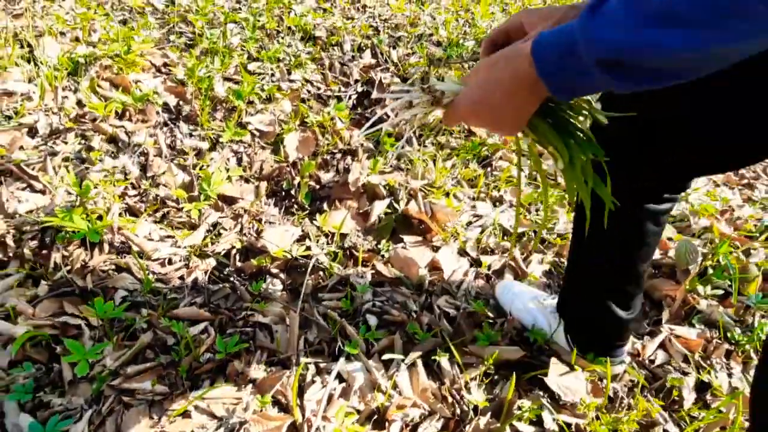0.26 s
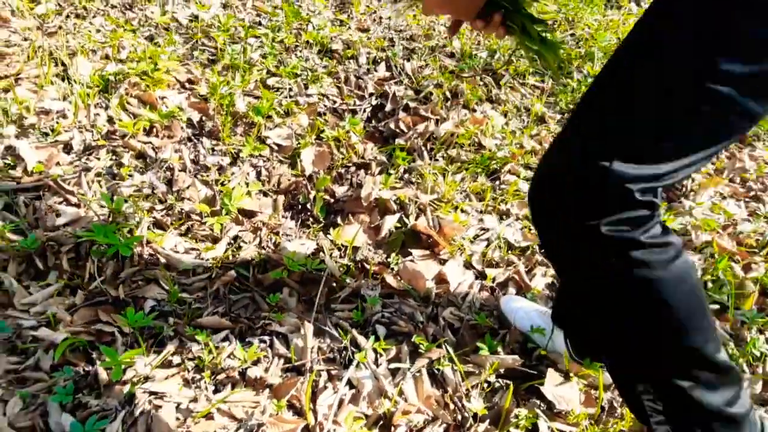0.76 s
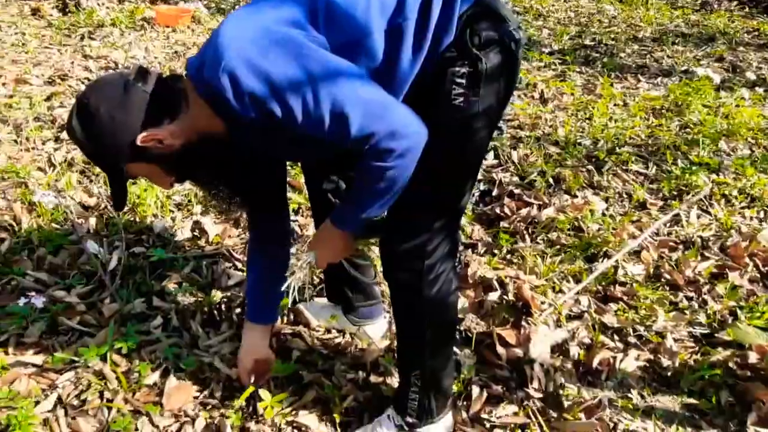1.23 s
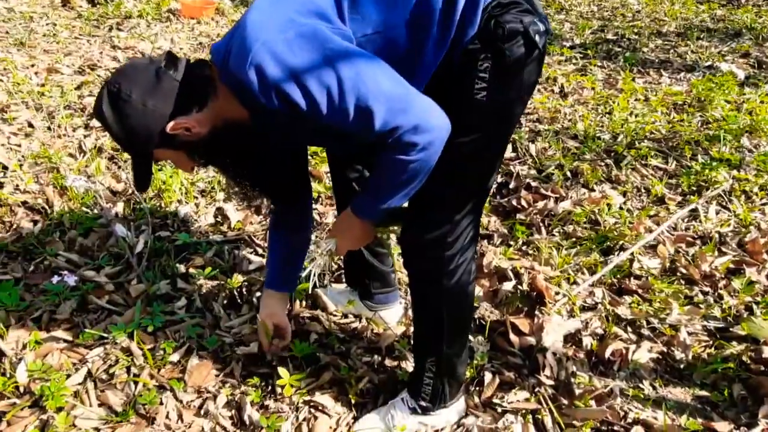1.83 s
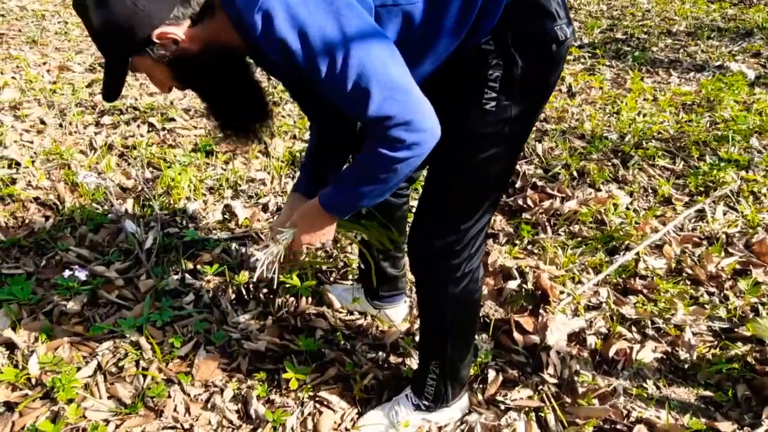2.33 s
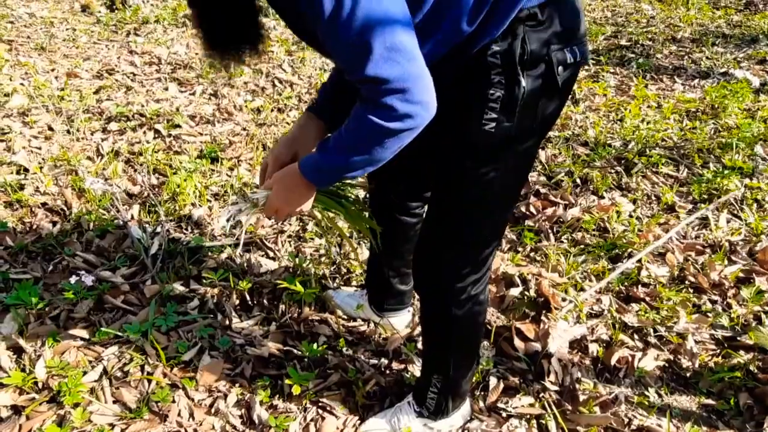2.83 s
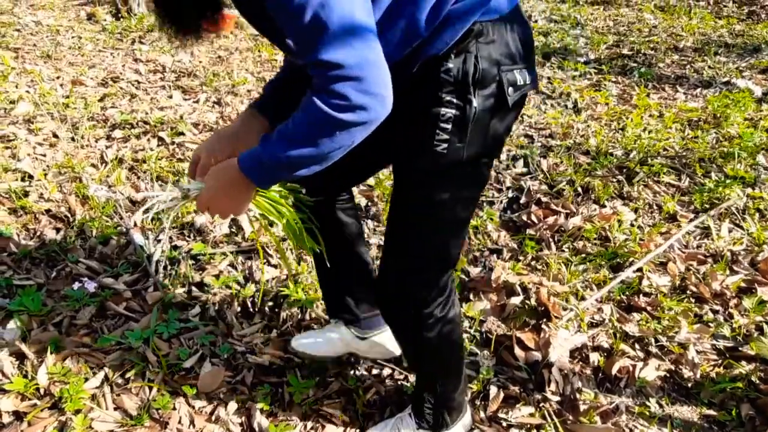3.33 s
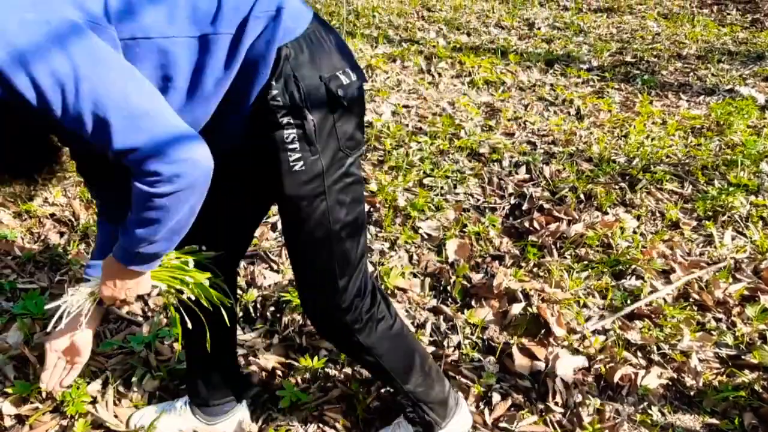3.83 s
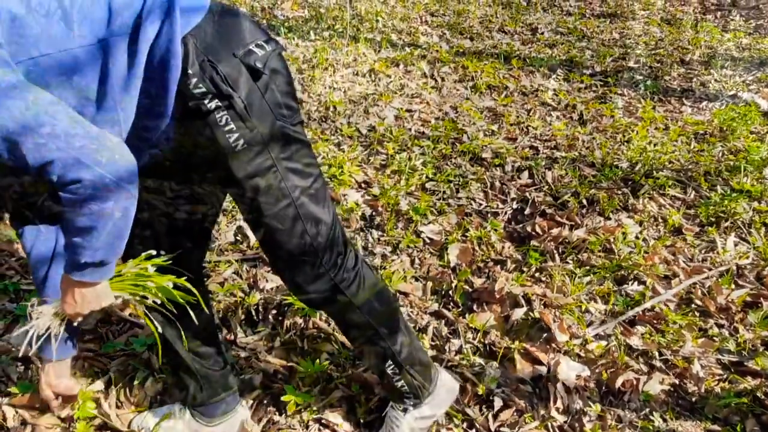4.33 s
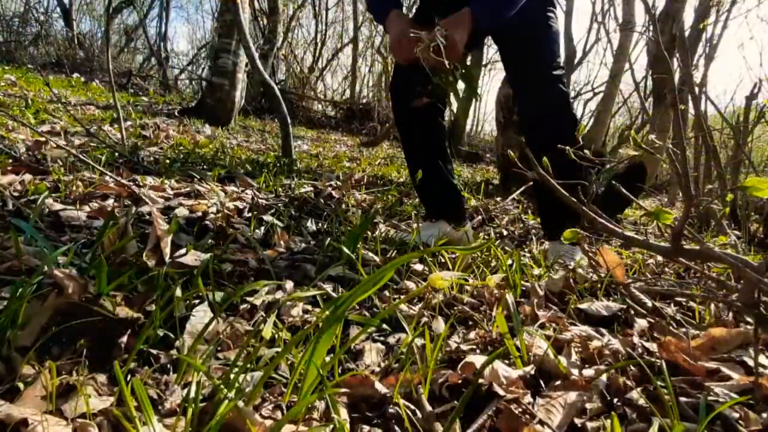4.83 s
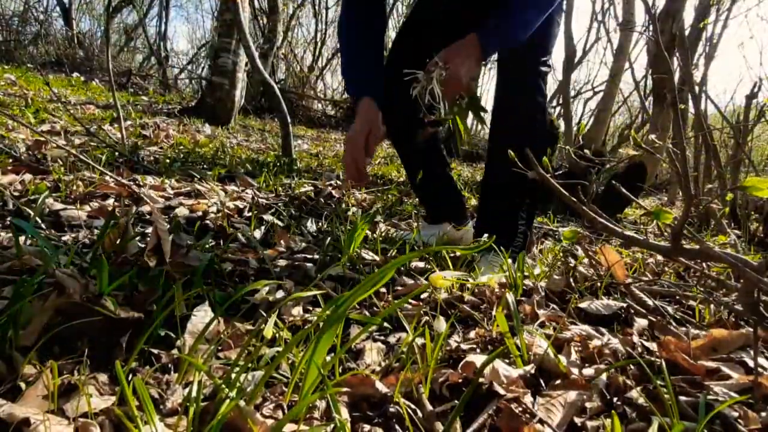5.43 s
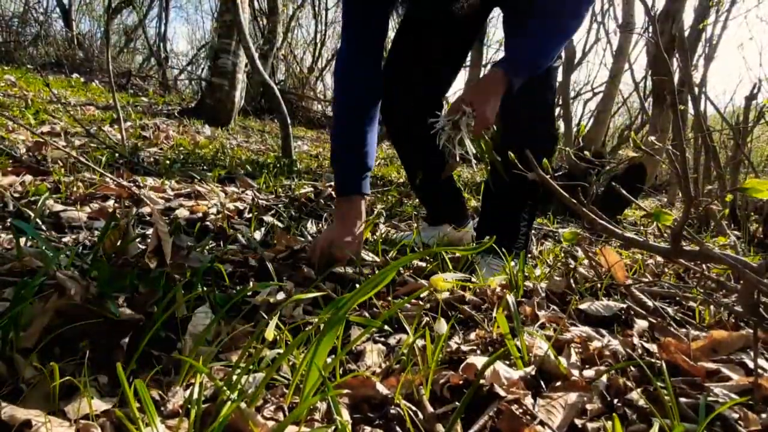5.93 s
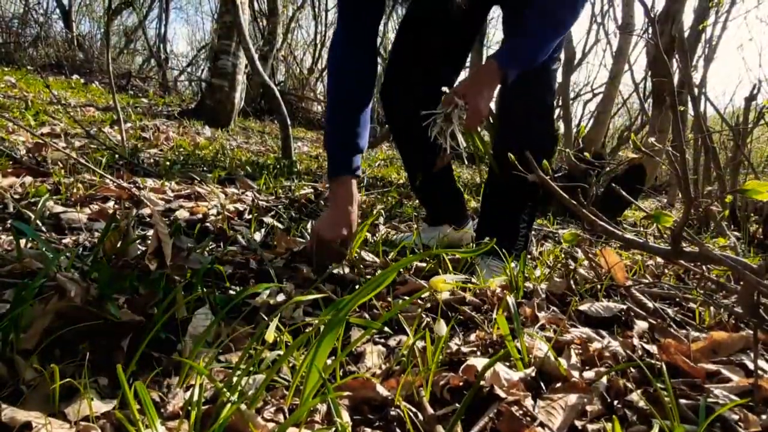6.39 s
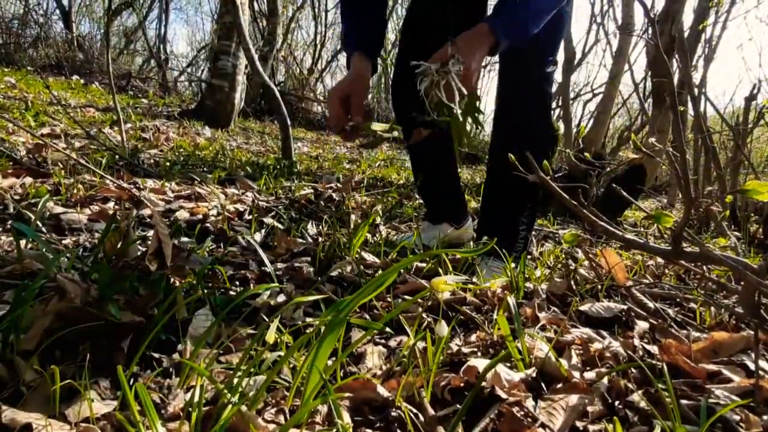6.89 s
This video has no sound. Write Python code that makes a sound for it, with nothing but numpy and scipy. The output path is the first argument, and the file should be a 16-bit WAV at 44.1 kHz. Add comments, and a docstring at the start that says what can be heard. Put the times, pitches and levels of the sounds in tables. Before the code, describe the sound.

Someone treads through crisp fallen leaves and pulls small plants from soil. Grainy crackle over papery hiss comes in uneven bursts, the strongest early on and again midway, separated by quiet gaps of faint ticking. Single stalks snap sharply and short hollow knocks come from roots and soles. The stereo sound is close, dry and open, with barely audible low air and no echo.

```python
"""In a quiet wood, someone steps through dry leaf litter and pulls up small plants, close to the microphone.
Shoes and hands crush the leaves in short swells: random tiny fractures over a chafing hiss, as shaped noise.
Stalks and twigs snap singly as bursts of noise with one resonance.
Roots and soles give dull knocks: decaying modes, a crunch of soil and a thud of the ground.
Faint air, as coloured noise, lies underneath."""
import sys
import numpy as np
from scipy import signal
from scipy.fft import rfft, irfft, next_fast_len
from scipy.io import wavfile

SR = 44100
rng = np.random.default_rng(int(sys.argv[2]) if len(sys.argv) > 2 else 0)


def generate_wav(sig):
    """Save sig (samples, or channels by samples) to the path in sys.argv[1] as 16-bit PCM at SR."""
    pcm = np.round(np.clip(np.atleast_2d(sig).T, -1, 1) * 32767).astype(np.int16)
    wavfile.write(sys.argv[1], SR, pcm)


N = 315300
TIME = np.arange(N) / SR
PADDED = next_fast_len(N, real=True)
DEEP_HZ, CRISP_HZ, TOP_HZ = 1000, 5000, 16100  # upper limits of deep litter, leaf blades and brittle edges


def undb(db):
    """Decibel law: 20 dB is a factor of ten in amplitude."""
    return np.exp(np.asarray(db) * (np.log(10) / 20))


def unit(x):
    """Normalisation: the same sound at rms 1."""
    return x / np.sqrt(np.mean(x ** 2))


def colour(table, hz):
    """Spectral envelope: gain of a (Hz, dB) table, interpolated along log frequency."""
    points, db = np.transpose(table)
    return undb(np.interp(np.log(hz + 1), np.log(points), db))


def panned(db):
    """Level-difference panning: left and right gains that share the difference equally."""
    return undb(np.array([[.5], [-.5]]) * db)


def walk(rate):
    """Slow modulation: random levels, rate of them a second, joined by straight lines; spread near 1."""
    count = int(N / SR * rate) + 2
    levels = 1.15 * rng.standard_normal(count)
    return np.interp(TIME * rate, np.arange(count), levels)


# width between the two ports: pitch_hz, side_minus_mid_db [Hz, dB]
PORT_WIDTH = [(60, -6.5), (160, -7), (350, -11), (700, -9.5), (1300, -3), (2400, -5), (4400, -4),
              (6000, -1.5), (8000, -3.5), (14000, -8)]
# difference in colour of the two ports: pitch_hz, left_minus_right_db [Hz, dB]
PORT_SHADE = [(300, 0), (700, -0.5), (1300, 4), (2400, .5), (4400, -3), (8000, 1), (14000, -2)]


def ports(pair):
    """Coherence: two unrelated sounds mix to left and right spectra, most alike around 350 to 700 Hz."""
    mid, side = rfft(pair)
    hz = np.fft.rfftfreq(pair.shape[1], 1 / SR)
    width = colour(PORT_WIDTH, hz)
    shade = colour(PORT_SHADE, hz) ** np.array([[.5], [-.5]])
    mixed = np.array([mid + width * side, mid - width * side])
    return mixed * shade / np.sqrt(1 + width ** 2)


# strokes of a shoe or hand through the litter: full_force_s [s], level_db [dB], rise_s, hold_s, fall_s [s],
# crispness_db, deep_litter_weight_db [dB re level], chafing_over_crackle_db [dB]
STIRRING_STROKES = [(0.0, -50, 0.05, 0.00906, 0.1, 3.9, -13, 8),
                    (0.108, -33.5, 0.061, 0.053, 0.077, 7.5, -11, 6.5),
                    (0.486, -41, 0.29, 0.015, 0.35, 2, -11.5, 4.0),
                    (0.571, -33, 0.056, 0.049, 0.14, 2, -9.0, 4.5),
                    (1.078, -45, 0.27, 0.1, 0.16, 0.5, -8.5, 7),
                    (1.221, -28, 0.038, 0.15, 0.072, 1.5, -8.7, -1),
                    (1.277, -29.5, 0.058, 0.13, 0.26, 4.5, -3, 3),
                    (1.556, -38, 0.088, 0.0113, 0.22, 3, -13, 7),
                    (1.8, -53.5, 0.16, 0.067, 0.258, 4, -36, 4),
                    (2.466, -56, 0.03, 0.008, 0.16, -2, -11, 5),
                    (2.856, -56, 0.61, 0.04, 0.2, 1.5, -14.5, 0.5),
                    (3.181, -38, 0.19, 0.074, 0.25, 1, -11.5, 4),
                    (3.434, -37, 0.14, 0.01, 0.58, 2, -6.5, -1),
                    (3.584, -32.5, 0.047, 0.025, 0.058, 8.0, -19, 0.5),
                    (3.663, -29, 0.12, 0.016, 0.19, 7.5, -6.5, 7),
                    (3.801, -35.5, 0.136, 0.084, 0.232, 5.5, -6, 1),
                    (4.031, -40, 0.071, 0.069, 0.41, 4, -8.5, 8),
                    (4.693, -52.5, 0.32, 0.023, 0.31, 5.5, -14, 1.5),
                    (4.758, -49, 0.0097, 0.0082, 0.063, 8, -1.5, 7.5),
                    (4.912, -50.5, 0.232, 0.019, 0.12, 7, -8.5, 12),
                    (5.228, -42.5, 0.069, 0.017, 0.1, 9, -13, 6),
                    (5.291, -30.5, 0.066, 0.066, 0.04, 2.5, -5.5, 4),
                    (5.416, -36.5, 0.045, 0.009, 0.29, 0, -8, -3),
                    (5.589, -39, 0.025, 0.008, 0.064, -0.2, -10.5, 1),
                    (5.722, -45.5, 0.194, 0.16, 0.21, 6, -7, 2.5),
                    (5.96, -49.5, 0.054, 0.034, 0.48, 8, -11, -1),
                    (6.315, -49.5, 0.26, 0.028, 0.14, 0.5, -6, 1.5),
                    (6.539, -51.5, 0.82, 0.073, 0.22, 8.5, -10, 3),
                    (6.807, -58.5, 0.052, 0.0074, 0.039, -1, -21, -1),
                    (6.933, -53, 0.061, 0.017, 0.18, 1, -17.5, 0.5),
                    (7.11, -50.5, 0.16, 0.036, 0.102, 5.5, -12.6, 0)]
STROKE_RANGE_DB = 20  # a stroke climbs this far in its rise time and drops as far in its fall time
# the bunch of plants in the hand never quite rests: the same four qualities as a stroke [dB]
BUNCH_DB, BUNCH_CRISP_DB, BUNCH_WEIGHT_DB, BUNCH_CHAFE_DB = -71, 7.5, -13.5, 7.5


def stirring(t):
    """Incoherent addition: strokes rise, hold and fall, and their powers add; four tracks in dB."""
    power = undb(2 * BUNCH_DB) + np.zeros(len(t))
    bunch_character_db = np.array([[BUNCH_CRISP_DB], [BUNCH_WEIGHT_DB], [BUNCH_CHAFE_DB]])
    shares = undb(2 * bunch_character_db) * power
    for s, db, rise, hold, fall, *character_db in STIRRING_STROKES:
        away = np.maximum(s - t, 0) / rise + np.maximum(t - s - hold, 0) / fall
        stroke = undb(2 * (db - STROKE_RANGE_DB * np.minimum(away, 10)))
        power = power + stroke
        shares = shares + undb(2 * np.array(character_db))[:, None] * stroke
    tracks = (power, *(shares / power))  # level, crispness, weight, chafing
    return [np.interp(TIME, t, 10 * np.log10(p)) for p in tracks]


def fractures(per_s, spread_db, ring_s, chafe):
    """Shot noise: strength of contact from tiny breaks of uneven size, each dying fast, over chafing."""
    hit = rng.random(N) < per_s / SR
    size = undb(spread_db * np.minimum(rng.exponential(size=N), 3.3))
    fade = np.exp(-2 / (ring_s * SR))  # power dies twice as fast as amplitude
    power = signal.lfilter([1 - fade], [1, -fade], hit * size ** 2)
    power = power * SR / per_s / np.mean(size ** 2)
    return np.sqrt((power + chafe ** 2) / (1 + chafe ** 2))


# colour of the dry leaves as heard through the microphone: pitch_hz, level_db [Hz, dB per Hz]
LEAF_COLOUR = [(45, -24), (110, -22), (180, -17), (250, -14.5), (315, -3), (440, -8.5), (680, -2.5),
               (1500, 0), (4000, 1.5), (7400, 7), (9500, -9), (11200, -0.5), (13400, 4.5), (16000, -1.5)]
# sound off the ground cancels the direct sound around one pitch, set by the microphone's height:
# time_s, pitch_hz, depth_db [s, Hz, dB]
GROUND_CANCELLATION = [(0, 2680, -3.5), (4.3, 2660, -3.5), (4.7, 2180, -7), (7.15, 2170, -9)]


def leaves(contact, lo, hi, count, flutter_db, flutter_rate, tilt_db=0):
    """Modulated resonance: one size range of leaves, whose narrow bands come and go as they bend."""
    hz = np.fft.rfftfreq(PADDED, 1 / SR)
    grains = np.pad(rng.standard_normal((2, N)) * contact, ((0, 0), (0, PADDED - N)))
    sound = (ports(grains) * colour(LEAF_COLOUR, hz)).astype(np.complex64)
    place = count * np.log((hz + 1) / lo) / np.log(hi / lo) - .5  # band number of each frequency
    dip_s, dip_hz, depth_db = np.transpose(GROUND_CANCELLATION)
    out = 0
    for k in range(count):
        band = np.maximum(1 - abs(place - k), 0).astype(np.float32)
        height = (k + .5) / count  # 0 to 1 from lo to hi
        centre = lo * (hi / lo) ** height
        nearness = np.exp(-(np.log(centre / dip_hz) / 0.13) ** 2)
        dip_db = np.interp(TIME, dip_s, depth_db * nearness)
        db = flutter_db * walk(flutter_rate) + tilt_db * (height - .6) + dip_db
        out = out + irfft(sound * band, PADDED)[:, :N] * undb(db).astype(np.float32)
    return unit(out)


def wander(pair, lag_s, rate):
    """Time-difference cue: the crackle shifts about the ground, reaching now one port first, now the other."""
    lag = lag_s * walk(rate) / 2
    left = np.interp(TIME + lag, TIME, pair[0])
    right = np.interp(TIME - lag, TIME, pair[1])
    return np.array([left, right])


# where the person works: time_s, left_minus_right_db [s, dB]
WORKING_PLACE = [(0, 1.3), (1.3, 1.8), (2.7, 2.5), (4.2, 2.5), (5.2, 0.1), (6.4, 2), (7.15, 1)]
SINK_S = 0.0031  # the deep litter gives this much later than the leaves on top
EDGE_LEAD_S = 0.0034  # the brittle top edges are brushed this much sooner than the leaves
# the further a touch is below firm, the more it tilts towards the small stiff leaves
FIRM_DB, LIGHT_DB_PER_DB = -35.5, 0.18


def rustle():
    """Event density: harder stirring breaks more leaves a second, so loud swells smooth, light touches tick."""
    crush_db, crisp_db, weight_db, chafe_db = stirring(TIME[::32])
    chafe = undb(chafe_db)
    per_s = 900 * undb(.35 * (crush_db + 39.5))
    contact = fractures(per_s, spread_db=4.5, ring_s=0.0015, chafe=chafe)
    contact = contact * undb(1.17 * walk(70))
    # broad damp leaves buckle more slowly
    folds = fractures(per_s / 2, spread_db=2.5, ring_s=0.0026, chafe=0.4 * chafe)

    deep_contact = np.hypot(0.66 * contact, folds)
    deep = leaves(deep_contact, 45, DEEP_HZ, count=16, flutter_db=2.0, flutter_rate=25)
    deep = deep * undb(np.interp(TIME - SINK_S, TIME, crush_db + weight_db) - 4.5)

    light_tilt_db = LIGHT_DB_PER_DB * (FIRM_DB - crush_db)
    blades = leaves(np.hypot(contact, .5 * folds), DEEP_HZ, CRISP_HZ, count=18,
                    flutter_db=2.5, flutter_rate=30, tilt_db=light_tilt_db)
    blades = wander(blades, lag_s=7e-5, rate=7) * undb(crush_db - 0.63)

    edges = leaves(contact, CRISP_HZ, TOP_HZ, count=18, flutter_db=3.5, flutter_rate=32)
    edges = edges * undb(np.interp(TIME + EDGE_LEAD_S, TIME, crush_db + crisp_db) - 0.76)
    return (deep + blades + edges) * panned(np.interp(TIME, *np.transpose(WORKING_PLACE)))


# colour of the still air: pitch_hz, level_db [Hz, dB per Hz]
AIR_COLOUR = [(20, -33.5), (45, -4.5), (80, 0.5), (130, -3), (210, -18), (310, -10), (560, -28.5),
              (2000, -34.5), (16000, -29.5)]
AIR_DB = -71.5  # level about which the air drifts


def air():
    """Broadband ambience: noise under a spectral envelope is a faint low murmur of open air among trees."""
    hz = np.fft.rfftfreq(N, 1 / SR)
    noise = irfft(ports(rng.standard_normal((2, N))) * colour(AIR_COLOUR, hz), N)
    return unit(noise) * undb(AIR_DB + 0.93 * walk(0.97))


# knocks of roots and soles: start_s [s], pop_peak_db [dB], pitch_hz [Hz], ring_t60_s [s],
# soil_thud_db [dB re pop peak]
ROOT_KNOCKS = [(0.1577, -31.5, 344, 0.039, -12), (1.3209, -19, 700, 0.01, -27),
               (1.353, -22, 566, 0.0088, -23.5), (1.5852, -30, 720, 0.031, -37),
               (1.958, -56.5, 390, .03, -22.5), (3.449, -37.5, 383, 0.039, -29),
               (3.7795, -26, 870, 0.02, -40), (4.753, -28, 610, 0.01, -7), (5.59, -47, 520, 0.0087, -15),
               (6.298, -26.5, 763, 0.012, -14), (6.3333, -40, 625, 0.014, -5.5)]
# modes of a root as it gives: multiple_of_pitch, level_db [ratio, dB]
ROOT_MODES = [(.42, -7.5), (.65, -29), (1, 29), (1.55, 4.5), (2.5, 14.5)]
# modes of the soft ground: pitch_hz, level_db, ring_t60_s [Hz, dB, s]
SOIL_MODES = [(111.6, -14.5, 0.19), (155, -2.5, 0.12), (191.4, -8.5, 0.14), (260, -12, 0.035),
              (318, -2, 0.066)]
TEAR_DB, TEAR_S, TEAR_HZ = -8.5, .003, 750  # crunch of soil: level re pop peak, decay, centre of its band


def knocks(size=8192):
    """Modal decay: a root gives with a short hollow pop and a crunch of soil, and the ground thuds after it."""
    out = np.zeros(N + size)
    t = np.arange(size) / SR
    no_bass = signal.butter(3, 220, "high", fs=SR, output="sos")  # a small root radiates no bass
    soil_band = signal.butter(2, [TEAR_HZ / 2, TEAR_HZ * 2], "band", fs=SR, output="sos")
    for s, db, hz, t60, soil_db in ROOT_KNOCKS:
        detune = 1 + 0.08 * rng.standard_normal(len(ROOT_MODES))
        pop = np.zeros(size)
        for (multiple, mode_db), shift in zip(ROOT_MODES, detune):
            pop += undb(mode_db) * np.sin(2 * np.pi * hz * multiple * shift * t)
        pop = signal.sosfilt(no_bass, pop * np.exp(-np.log(1000) * t / t60))

        grit = signal.sosfilt(soil_band, rng.standard_normal(size))
        tear = unit(grit) * np.exp(-t / TEAR_S) * undb(TEAR_DB)

        thud = np.zeros(size)
        for mode_hz, mode_db, ring in SOIL_MODES:
            thud += undb(mode_db) * np.sin(2 * np.pi * mode_hz * t) * np.exp(-np.log(1000) * t / ring)
        thud = thud * (1 - np.exp(-t / 0.003))  # the soft ground answers late

        start = int(s * SR)
        out[start:start + size] += undb(db) * (pop / abs(pop).max() + tear - undb(soil_db) * thud)
    return out[:N]


# stalks and brittle leaves breaking: start_s [s], level_db [dB], ring_pitch_hz [Hz],
# crispness_db [dB], left_minus_right_db [dB]
STALK_SNAPS = [(0.491, -30.5, 1980, 0, 4), (0.5428, -21, 4500, 4, 0), (0.9849, -25, 6770, 2, 5),
               (1.0811, -32.5, 7160, 3, 3), (1.3212, -19, 3140, -11, 4), (1.354, -22.5, 7700, 3, 10),
               (1.3875, -26, 7300, 13, 2), (1.413, -21, 7600, 19, -8), (1.586, -29.5, 1360, -24, 7),
               (1.9575, -36.5, 2430, 6.5, -1), (2.4368, -45.5, 3940, 8, 4), (2.4787, -44.5, 3900, -15, 1),
               (2.558, -49, 2940, 1, 2), (2.584, -43.5, 8300, 43, -2), (2.64, -45, 4600, 14, 4),
               (2.715, -47, 4040, 0, 6), (2.8511, -46, 7700, 10, 0), (2.89, -41.5, 3950, 2, 1),
               (3.025, -46, 1600, 3, 6), (3.0546, -39, 7200, 20, 7), (3.347, -33.5, 6500, -28, 0),
               (3.4499, -32, 7000, 15.5, 10), (3.7802, -27, 1420, -13, 2), (3.878, -23, 7250, 22, -2),
               (4.184, -18.5, 4700, 15.5, 0.5), (4.2453, -36, 5600, 17, -3), (4.7535, -28, 1590, 7, 2),
               (5.8244, -29.5, 6000, 12, -4), (5.967, -30.5, 7600, 24, 5), (6.297, -21, 8600, 0.5, -2),
               (6.693, -36, 8000, 13, 0), (6.878, -45.5, 6870, 7, -4)]
SNAP_S = 0.0024  # time scale on which the fibres of a stalk part


def snaps(size=2048):
    """Excited resonance: a quick run of breaking fibres rings at one pitch; nearby leaves shiver briefly."""
    out = np.zeros((2, N + size))
    t = (np.arange(size) - size // 8) / SR
    hz = np.fft.rfftfreq(size, 1 / SR)
    burst = np.exp(-abs(t) / SNAP_S * np.where(t < 0, 4, 1.1))  # swift onset, slower decay
    shiver = undb(-25) * (t > 0) * np.exp(-abs(t) / .007)
    for s, db, ring_hz, crisp_db, pan_db in STALK_SNAPS:
        unevenness = undb(2.5 * np.repeat(rng.standard_normal(size // 8), 8))
        fibres = rng.standard_normal((2, size)) * unevenness
        ring = 1 + 2.9 / (1 + ((hz - ring_hz) / (0.17 * ring_hz)) ** 2)
        tilt = undb((crisp_db - 4) / (1 + (CRISP_HZ / (hz + 1)) ** 3))
        tilt = tilt * hz / np.hypot(hz, 600)  # less bass
        crack = irfft(ports(fibres * (burst + shiver)) * colour(LEAF_COLOUR, hz) * ring * tilt)
        gain = np.sqrt(SNAP_S * SR / size) * undb(db)  # level over the snap, not over the whole window
        start = max(int(s * SR) - size // 8, 0)
        out[:, start:start + size] += unit(crack) * gain * panned(pan_db)
    return out[:, :N]


def scene():
    """Free field: leaves, air, knocks and snaps add in the open, with no walls to echo them."""
    return rustle() + air() + knocks() + snaps()


def record(dry):
    """Band limiting: the recorder cuts the top with a steep low-pass."""
    return signal.sosfilt(signal.ellip(12, .2, 75, TOP_HZ, fs=SR, output="sos"), dry)


dry = scene()
out = record(dry)
generate_wav(out)
```